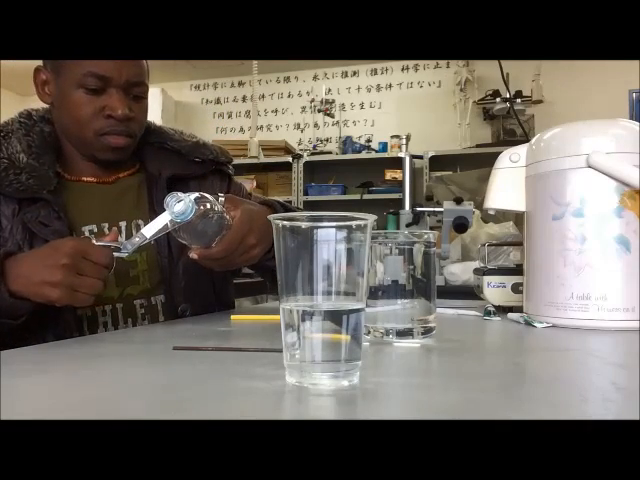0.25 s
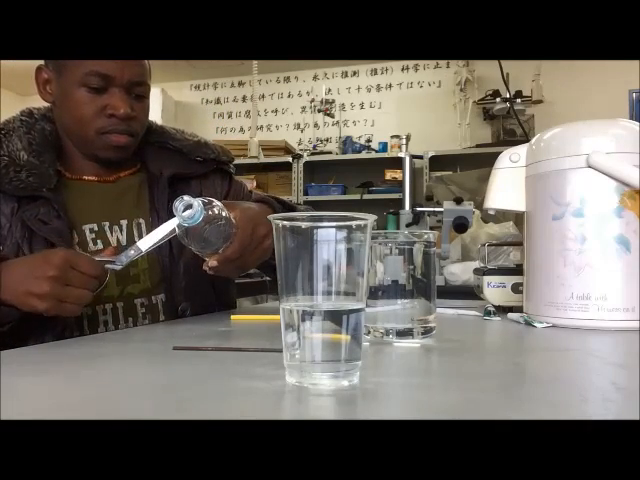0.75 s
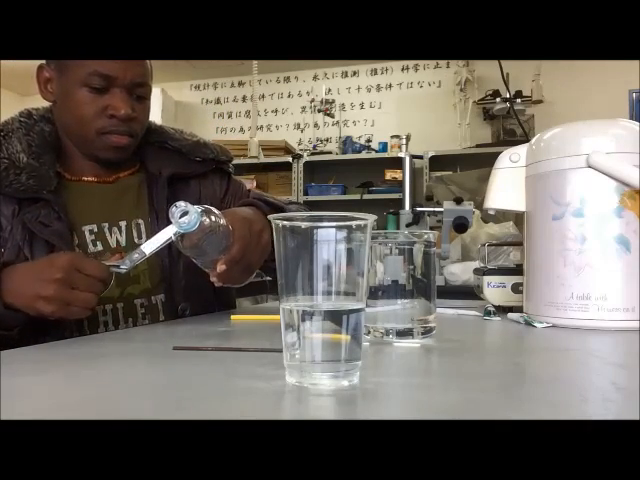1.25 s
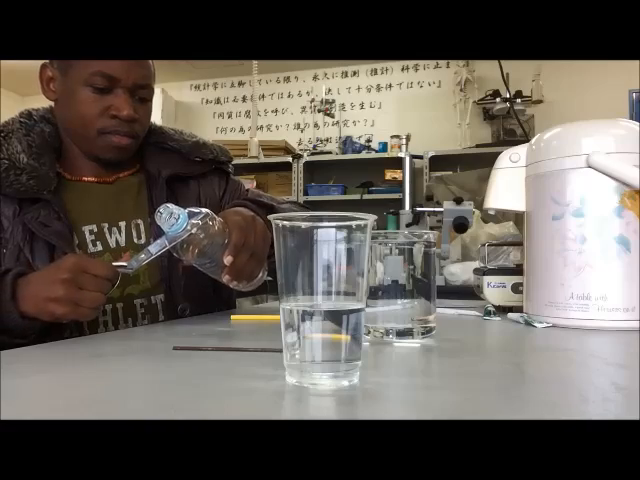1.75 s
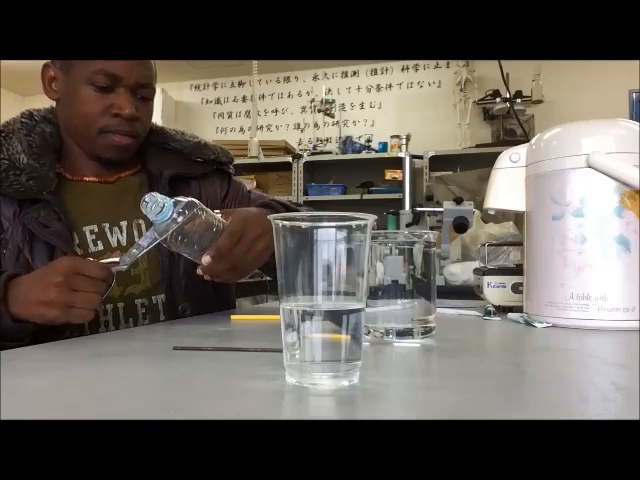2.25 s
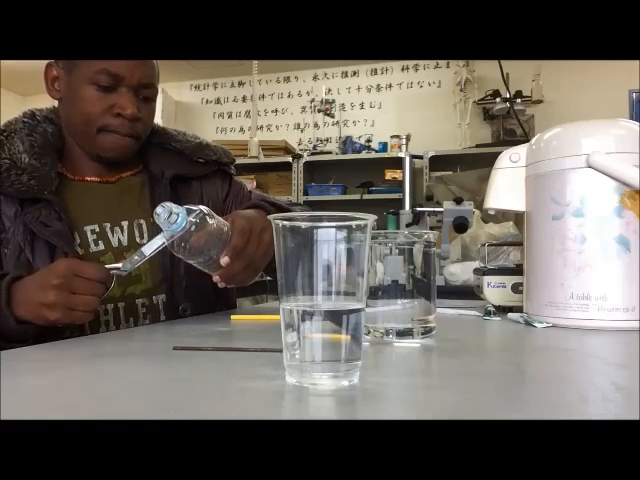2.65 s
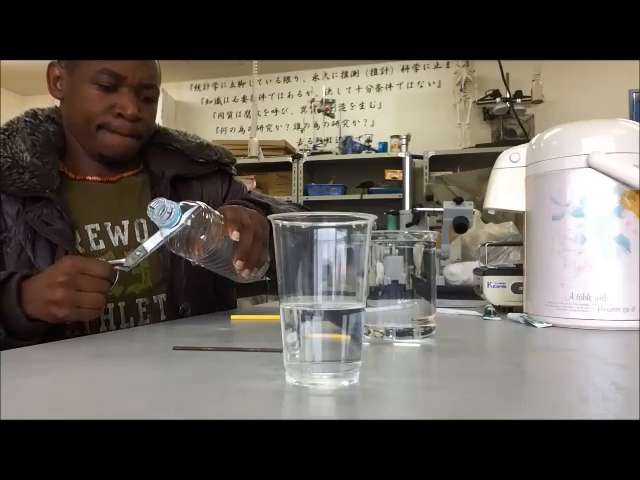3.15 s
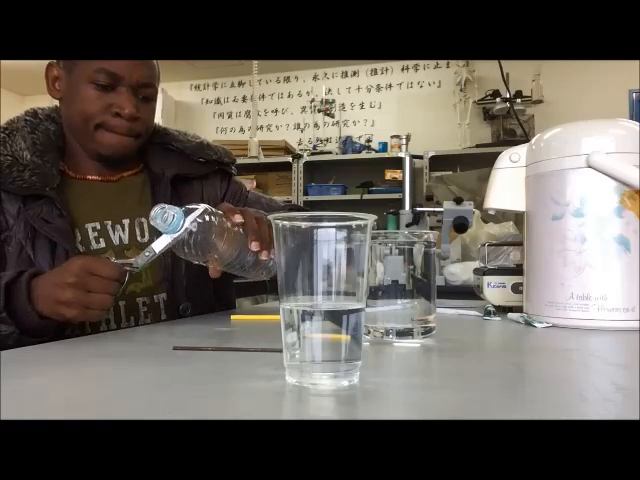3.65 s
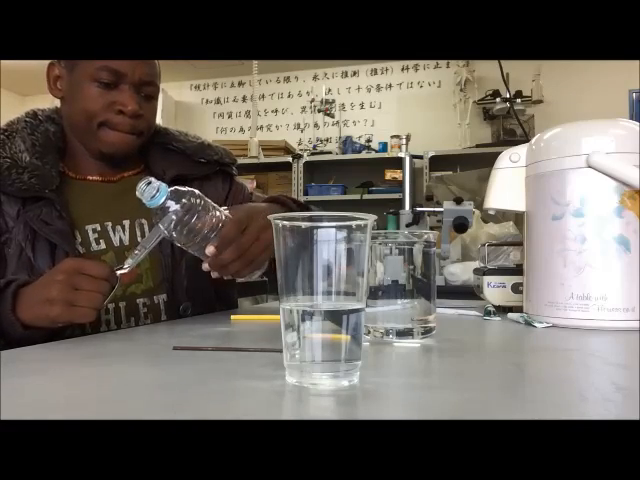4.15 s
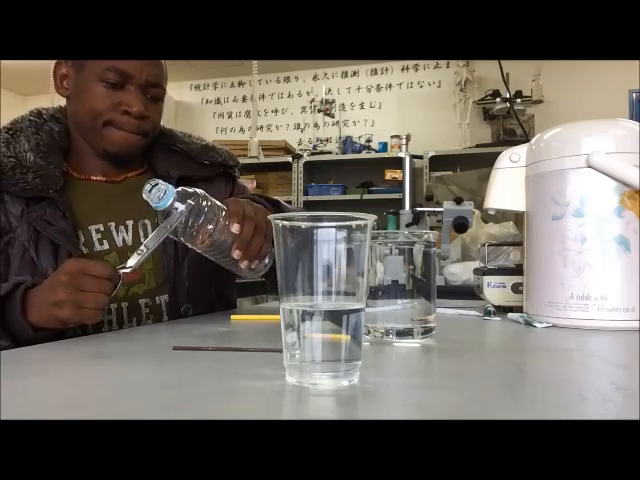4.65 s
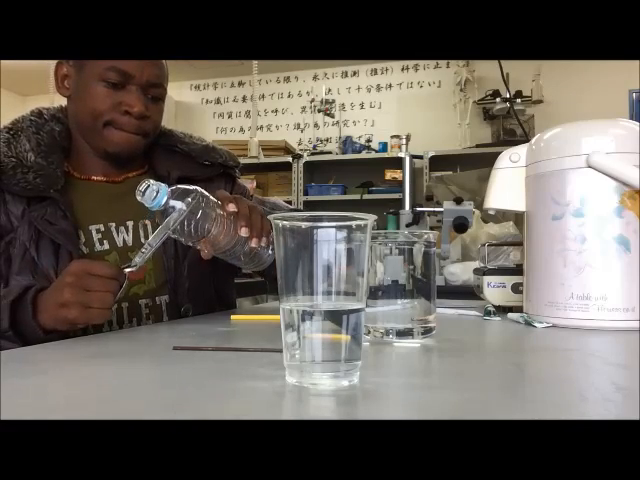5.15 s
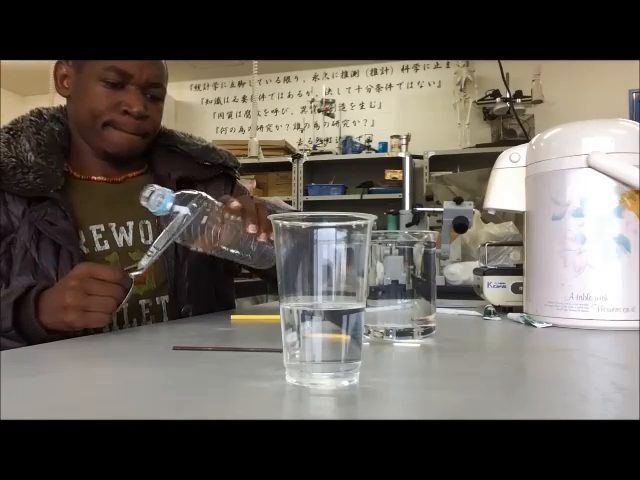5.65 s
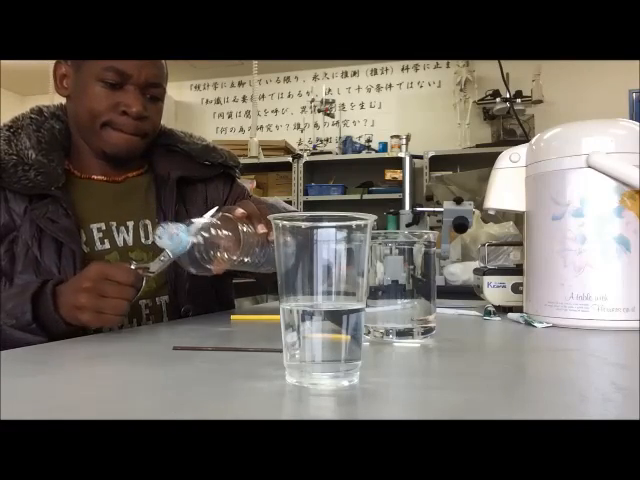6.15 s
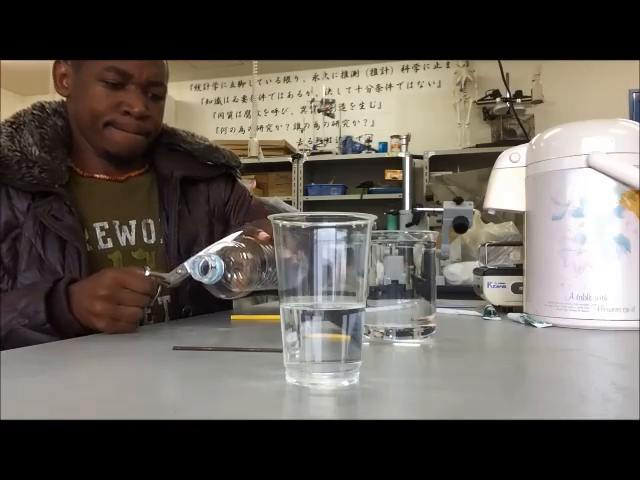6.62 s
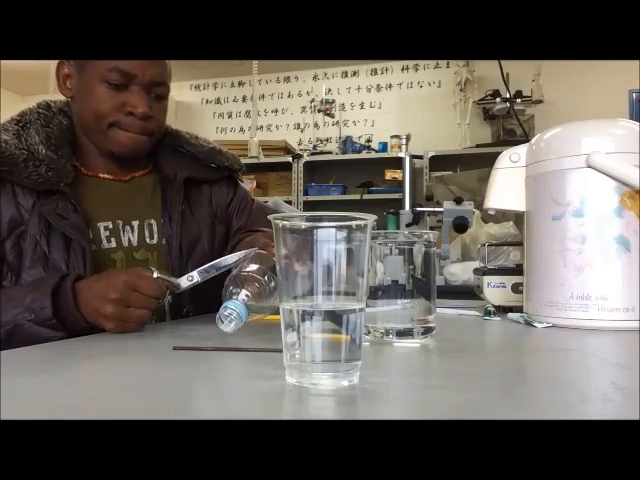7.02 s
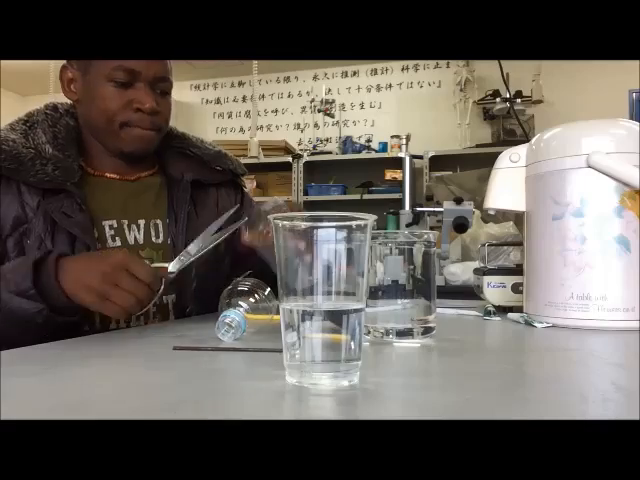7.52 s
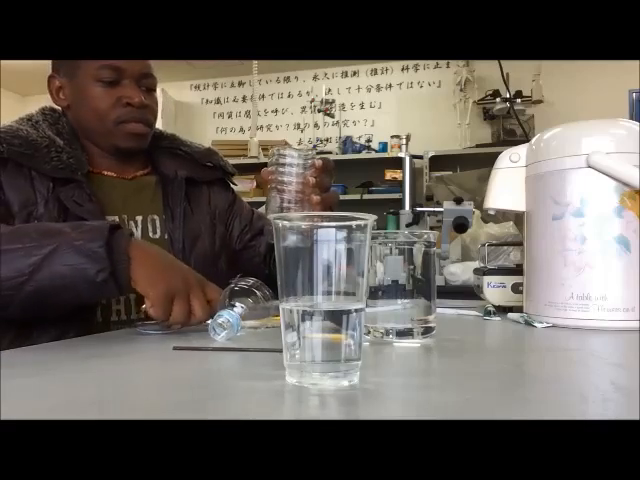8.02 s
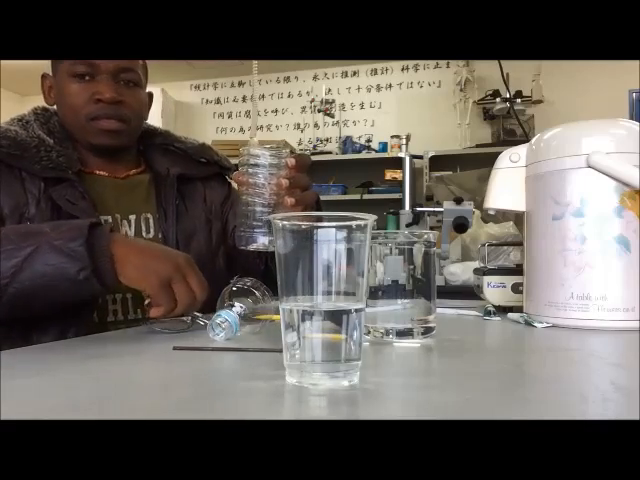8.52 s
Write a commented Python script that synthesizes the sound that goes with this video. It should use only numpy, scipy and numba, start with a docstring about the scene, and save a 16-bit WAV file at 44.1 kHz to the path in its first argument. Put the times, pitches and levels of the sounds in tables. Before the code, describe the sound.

Close mono pickup at a hard bench, faint room rumble and hiss, short reverberation. A bright crack opens the cutting, then scattered plastic crackles, soft blade rasps and low creaking resonances, some snaps ringing hollow. After the final snip the light bottle neck patters down in quickening bounces, steel scissors knock and jingle on the bench, and a faint shuffle ends with a small squeaky scrape.

```python
"""A faint room bed opens, then scissors stab the neck of a thin plastic bottle at a classroom bench.
Coloured clicks and torn noise make the snaps, ringing the hollow bottle mostly higher as the cut opens; between
them, clumped random slips rasp at the blades and creak through moving resonances of the bottle. The blades meet;
the neck, a set of damped modes, falls and bounces on the bench, and the blades rustle faintly. The scissors
ring and knock as they are put down, a hand shuffles on the bench, and they scrape and squeak as they are pushed."""
import sys
import numpy as np
from scipy import signal
from scipy.fft import rfft, irfft, next_fast_len
from scipy.io import wavfile
from scipy.ndimage import map_coordinates
from numba import njit

SR = 44100
rng = np.random.default_rng(int(sys.argv[2]) if len(sys.argv) > 2 else 0)


def dump_mix(stems):
    """Bounce the given channels to the path in sys.argv[1] as a 16-bit WAV at rate SR."""
    frames = np.atleast_2d(stems).T  # one column per channel
    limited = np.clip(frames, -1, 1)  # hard clip at full scale
    pcm = np.round(limited * 32767).astype(np.int16)
    wavfile.write(sys.argv[1], SR, pcm)


N = 387189  # length in samples

# Spectrum of the room's air. Each row: frequency in Hz, relative density in dB per Hz.
AIR = [(25, -21), (75, -4.5), (200, -11), (800, -17), (1500, -23), (3000, -28), (10000, -33), (15500, -38)]
# Decay of the room's tail. Each row: frequency in Hz, t60 in seconds.
ROOM = [(100, 0.29), (400, 0.44), (1200, 0.17), (3000, 0.18), (8000, 0.26), (15000, 0.25)]
# The wall snaps and buckles. Each row: time of the break in seconds, then levels in dB before trims:
# sharp crack, crunch, wall ring, hollow body.
SNAPS = [(0.4174, -55, -62, -77, -62), (0.439, -17, -28.5, -30, -33), (1.118, -64.5, -47, -46.5, -47.5),
         (1.2066, -75, -71, -49.5, -48.5), (1.401, -62.5, -61.5, -89.5, -73),
         (1.4408, -44.5, -45, -34.5, -33), (1.5144, -49, -48, -46, -48.5), (1.5612, -55, -51.5, -53, -45),
         (1.6387, -41, -38.5, -42.5, -38), (1.812, -30, -38, -40.5, -50.5),
         (2.2962, -58.5, -46.5, -37.5, -40), (2.4359, -41.5, -45, -35, -38.5),
         (2.4913, -29.5, -32.5, -41, -55), (2.5267, -66, -68, -35, -52), (2.564, -46.5, -46, -53, -50.5),
         (2.684, -62.5, -70, -59.5, -50.5), (2.935, -55.5, -49, -35.5, -41), (2.998, -45, -44, -37, -43.5),
         (3.2498, -45, -37.5, -23, -25.5), (3.7724, -56.5, -54, -37, -25.5), (4.027, -59, -52.5, -52, -37),
         (4.2681, -67.5, -62, -52.5, -48), (4.6259, -70, -63, -65, -45), (4.9851, -51, -53.5, -56, -43.5),
         (5.1453, -69, -62, -61.5, -51.5), (5.3708, -61, -56, -44.5, -53), (5.3863, -47.5, -50, -37.5, -55),
         (5.6843, -54, -54, -71, -37), (5.793, -57, -59, -43.5, -29), (5.864, -39, -39.5, -52, -29.5),
         (5.9194, -45.5, -51.5, -62, -49), (6.0758, -64, -61.5, -58, -35),
         (6.132, -37.5, -43.5, -39.5, -33.5), (6.1398, -43, -41.5, -40, -30), (6.236, -54, -50, -46, -39.5),
         (6.329, -71, -60.5, -55, -35.5), (6.4327, -61, -51, -53, -34), (6.5227, -77, -54, -54.5, -45.5),
         (6.629, -79, -60.5, -60, -49), (7.0049, -58.5, -56.5, -76, -39), (7.0136, -55, -54, -58, -44),
         (7.0406, -62.5, -70, -88, -43.5), (7.245, -46.5, -42, -58, -31)]
# Resonances as the cut opens. Each row: time in seconds, air cavity in Hz, panel in Hz, wall ring in Hz.
BOTTLE = [(.44, 304.6, 552, 1125), (1.44, 370.8, 573, 1168), (3.25, 423, 560, 1196),
          (3.8, 477.4, 560, 1223), (5, 500, 586, 1257), (6.1, 493.8, 655.4, 1315), (7.2, 530, 610, 1380)]
# Spectra of the sharp crack, the crunch, the blades clashing shut and the blades' rasp.
# Each row: frequency in Hz, relative density in dB per Hz.
CRACK = [(3000, -30.5), (5200, -6.5), (6300, 0), (7500, 1), (8500, 0.5), (10000, -4.5), (14000, -15),
         (16000, -21.5)]
CRUNCH = [(600, -17), (1400, -4.5), (2500, -2.5), (3400, -2.5), (4000, 0.5), (4800, -11), (7000, -18),
          (15000, -37)]
CLASH = [(3000, -12), (7000, -10), (10000, -6), (14500, -4), (16000, -11)]
RASP = [(600, -29), (1300, -7.5), (1950, 8), (2400, -9), (3400, 5.5), (4000, 1.5), (4800, -8), (7300, 0.5),
        (10000, -1.5), (15500, -14)]
# Strokes of the blades, biting or only bending the wall; last, the blades rustle faintly.
# Each row: start in seconds, hold in seconds, rasp level in dB before trims, creak level in dB.
BLADE_MOVES = [(.56, 0.076, -64.5, -65), (.67, 0.037, -56, -52.5), (.945, 0.055, -52.5, -55.5),
               (1.16, .11, -64, -56.5), (1.495, 0.05, -53.5, -46), (1.78, .03, -62, -58),
               (2.03, 0.1, -76, -62.5), (2.16, 0.19, -65, -51), (2.45, 0.066, -48, -49.5),
               (2.61, 0.11, -62.5, -65), (2.975, 0.026, -45.5, -45.5), (3.12, 0.21, -64, -56.5),
               (3.50, 0.044, -55.5, -54.5), (3.55, 0.032, -46, -51), (3.715, .04, -58.5, -44),
               (3.90, .24, -76.5, -55), (4.335, 0.027, -46.5, -43.5), (4.40, 0.082, -59.5, -49),
               (4.52, .2, -66, -57.5), (4.91, 0.046, -46, -39.5), (5.10, 0.11, -72.5, -63),
               (5.29, 0.053, -60.5, -52), (5.39, 0.033, -55, -47.5), (5.625, .04, -73.5, -57),
               (5.68, 0.014, -54.5, -38.5), (5.76, 0.043, -70, -46.5), (5.825, 0.026, -52, -50),
               (5.95, .02, -67.5, -53.5), (6.04, 0.48, -76, -65.5), (6.935, 0.023, -66, -57.5),
               (7.58, 0.051, -71.5, -79)]
# Modes of the neck, then of the blades. Each row: frequency in Hz, relative level in dB, t60 in seconds.
NECK = [(331, -6.5, 0.058), (530, -2, 0.029), (692, 3, 0.022), (1160, 1, 0.033), (1430, 6.5, 0.022),
        (1635, -6, 0.022), (1870, -12, 0.018), (3870, -19, 0.11), (4200, -23, 0.046)]
STEEL = [(4230, -14, 0.12), (5370, -13, 0.11), (5750, -10, .08), (7360, -4, 0.089), (8300, -9.5, 0.16),
         (9426, -6.5, 0.11), (10350, -14, .14), (10980, -11, .12), (12020, -5, 0.11), (12520, -10, .12),
         (13200, -16, .09), (14500, -9, .1)]
# The scissors touch the bench. Each row: time in seconds, steel level in dB before trim, knock level in dB.
CONTACTS = [(7.879, -37.5, -37.5), (7.8909, -27, -26.5), (7.907, -31, -32.5), (7.919, -45, -52),
            (8.403, -73, -53.5), (8.4732, -79, -48)]
# A hand shuffles on the bench, then the scissors are pushed along it. Each row: start in seconds,
# hold in seconds, scrape level in dB, squeak level in dB, blade ring level in dB.
BENCH_MOVES = [(8.19, 0.077, -68, -89, -103), (8.42, 0.14, -52.5, -60, -84),
               (8.515, 0.079, -53.5, -51.5, -65), (8.68, 0.049, -64, -83.5, -90)]
# Spectra of the bench's knock, the low thud and the scrape.
# Each row: frequency in Hz, relative density in dB per Hz.
KNOCK = [(60, -19), (300, -0.5), (800, -1.5), (1200, 3.5), (1600, 5), (2200, -6.5), (4000, -14),
         (7000, -22), (15000, -28.5)]
THUD = [(25, -18.5), (65, -3), (260, -2), (500, -16.5), (1200, -24.5)]
SCRAPE = [(70, -5), (300, 1), (1800, -9.5), (2600, -22), (4800, -25.5), (5700, -24), (6800, -30.5),
          (15000, -36)]

HIT = SR // 3  # samples in which a hit dies away
LEAD = 90  # samples of tearing before the wall gives way
# a move of the hand swells, holds and lets go
SWELL_DB_PER_S, RELEASE_DB_PER_S = 655, 418.5
# after a snap the wall creaks on as it settles, starting below the snap's hollow body
SETTLE_DB, SETTLE_DB_PER_S = -12, 269.5
GRIP_DB = -73.5  # the hand's steady grip keeps the bottle creaking faintly
CLUMP_DB = 3  # depth of the clumping of the tears
# the neck lands: time, level, first flight, each flight over the last, loss a bounce
LANDING_S, LANDING_DB, FLIGHT_S, FLIGHT_SHRINK, BOUNCE_LOSS_DB = 7.2759, -25.5, .0402, .845, 4
TOP_HZ = 15450  # upper band limit


def amp(db):
    """Decibels to gain."""
    return 10 ** (np.asarray(db) / 20)


def unit(x):
    """Scale to rms 1."""
    return x / np.sqrt(np.mean(x ** 2) + 1e-20)


def blow(x):
    """Scale a hit to the energy of 10 ms at rms 1."""
    return x * np.sqrt(SR / 100 / np.sum(x ** 2))


def along(points, hz):
    """Read (Hz, value) points on a log frequency axis."""
    f, v = np.transpose(points)
    return np.interp(np.log(hz + 1), np.log(f + 1), v)


def curves(rows, at):
    """Each column after the time, read at the given times."""
    s, *cols = np.transpose(rows)
    return [np.interp(at, s, c) for c in cols]


def clock(size):
    """Sample times in seconds."""
    return np.arange(size) / SR


def wobble(rate):
    """A smooth random curve, rate knots a second."""
    knots = rng.standard_normal(int(N * rate / SR) + 4)
    return map_coordinates(knots, [np.arange(N) * rate / SR])


def add(track, s, x):
    """Mix x into the track at time s."""
    part = track[round(s * SR):][:len(x)]
    part += x[:len(part)]


def colour(x, spectrum):
    """Causal minimum-phase filter with the given spectrum."""
    size = 4096
    cep = irfft(np.log(amp(along(spectrum, np.fft.rfftfreq(size, 1 / SR)))))
    # fold the cepstrum forward in time so that nothing sounds early
    cep[1:size // 2] *= 2
    cep[size // 2 + 1:] = 0
    return signal.fftconvolve(x, irfft(np.exp(rfft(cep))))[:len(x)]


def burst(t, t60, spectrum):
    """A coloured puff of noise that dies away."""
    puff = rng.standard_normal(len(t)) * amp(-60 * t / t60)
    return blow(colour(puff, spectrum))


def ring(t, modes, attack, scatter_db=2):
    """Damped modes, struck at new strengths and phases."""
    waves = np.zeros(len(t))
    for hz, db, t60 in modes:
        level = amp(db + scatter_db * rng.normal() - 60 * t / t60)
        waves += level * np.sin(2 * np.pi * (hz * t + rng.random()))
    return blow(waves * (1 - np.exp(-t / attack)) ** 2)


def grains(rate, spread_db):
    """Random tiny slips, rate a second on average, their sizes spread at random in dB."""
    sizes = amp(spread_db * np.minimum(rng.exponential(size=N), 4))
    return unit((rng.random(N) < rate / SR) * sizes * rng.choice([-1, 1], N))


@njit
def resonate(x, hz, width_hz):
    """A resonance whose centre moves."""
    y, z = np.zeros(len(x)), 0j
    for i in range(len(x)):
        z = z * np.exp((2j * np.pi * hz[i] - np.pi * width_hz) / SR) + x[i]
        y[i] = z.real
    return y


def room(x, wet_db):
    """The classroom's tail: noise that builds up over a few milliseconds and decays by frequency."""
    hz, t, z = signal.stft(rng.standard_normal(HIT), SR, nperseg=256)
    decay = amp(-60 * t / along(ROOM, hz)[:, None])
    tail = signal.istft(z * decay, SR, nperseg=256)[1]
    tail *= 1 - np.exp(-(clock(len(tail)) / 0.0025) ** 2)
    return amp(wet_db) * signal.fftconvolve(x, tail / np.linalg.norm(tail))[:len(x)]


def in_room(x, wet_db):
    """Direct sound plus the room."""
    return x + room(x, wet_db)


def gesture(t, start, length):
    """Level in dB of one move of the hand: it swells, holds at 0 and lets go."""
    swell = -SWELL_DB_PER_S * np.maximum(start - t, 0)
    release = -RELEASE_DB_PER_S * np.maximum(t - start - length, 0)
    return swell + release


def gesture_levels(rows):
    """One dB curve for each level column of (start, length, dB, ..) rows; the strongest move prevails."""
    t = clock(N)
    levels = np.full((len(rows[0]) - 2, N), -120.)
    for start, length, *dbs in rows:
        near = slice(*np.searchsorted(t, [start - .5, start + length + .5]))
        move = np.array(dbs)[:, None] + gesture(t[near], start, length)
        levels[:, near] = np.maximum(levels[:, near], move)
    return levels


def room_air():
    """Coloured noise, drifting slightly in level, gives the faint rumble and hiss of the room."""
    noise = unit(colour(rng.standard_normal(N), AIR))
    return amp(-71.5 + 0.67 * wobble(2.8)) * noise


def fracture(t, spectrum, sharp, t60, wet_db):
    """One clean click (its share of the energy is sharp) amid a short tearing; the room answers the click."""
    click = blow(colour(1. * (t == t[LEAD]), spectrum))
    swell = np.minimum(t / t[LEAD], 1) ** 3
    tearing = blow(swell * burst(t, t60, spectrum))
    sharp = np.clip(sharp, 0, 1)
    return np.sqrt(sharp) * click + np.sqrt(1 - sharp) * tearing + room(click, wet_db)


def through_wall(x, share, t60):
    """The thin wall's many short modes take a share of the energy and ripple the spectrum."""
    t = clock(1024)
    modes = rng.standard_normal(len(t)) * amp(-60 * t / t60) * (t > 0)
    rung = signal.fftconvolve(x, modes / np.linalg.norm(modes))[:len(x)]
    share = np.clip(share, 0, 1)
    return np.sqrt(1 - share) * x + np.sqrt(share) * rung


def snaps():
    """Each snap is a brief crack; the wall springs back and rings the hollow bottle."""
    out, t = np.zeros(N), clock(HIT)
    for s, crack_db, crunch_db, wall_db, body_db in SNAPS:
        air_hz, panel_hz, wall_hz = curves(BOTTLE, s)
        # the harder the break, the cleaner it runs
        sharp = np.interp(crack_db, [-42, -18], [.1, .8])
        crack = fracture(t, CRACK, sharp, t60=.014, wet_db=-7.0)
        crack = through_wall(crack, share=0.034, t60=0.0078)
        crunch = fracture(t, CRUNCH, sharp / 2, t60=0.023, wet_db=-4.5)
        crunch = through_wall(crunch, share=0.36, t60=.015)
        add(out, s - t[LEAD], amp(crack_db + 1) * crack + amp(crunch_db + 2) * crunch)

        # the grip bends the panels differently every time
        bend = np.exp(.04 * rng.standard_normal(2))
        panel_hz, side_hz = np.array([panel_hz, 1.09 * wall_hz]) * bend
        wall_hz = wall_hz * (1 + 0.011 * rng.normal())
        air_hz = air_hz * (1 + 0.038 * rng.normal())
        # t60 in seconds: the bottle rings longest while it is still closed
        life = np.interp(s, [BOTTLE[0][0], BOTTLE[1][0], BOTTLE[-1][0]], [.16, .07, .048])
        wall = ring(t, [(wall_hz, 0, 0.94 * life), (side_hz, -3, .022)], attack=0.00054)
        body = ring(t, [(air_hz, 0, life), (panel_hz, .5, 0.66 * life)], attack=0.0016)
        hollow = amp(wall_db) * wall + amp(body_db) * body
        add(out, s - t[LEAD] / 2, in_room(hollow, wet_db=-10.0))
    # the first stab thumps the hand; the last cut ends with the blades meeting
    add(out, SNAPS[1][0] - .008, amp(-39.5) * burst(t, .07, THUD))
    add(out, SNAPS[-1][0], amp(-37.0) * fracture(t, CLASH, 0.092, t60=0.016, wet_db=-1.5))
    return out


def settling():
    """Strength of the creak that each snap leaves behind, summed as power."""
    power, t = np.zeros(N), clock(SR // 2)
    for s, *_, body_db in SNAPS:
        add(power, s, amp(body_db + SETTLE_DB - SETTLE_DB_PER_S * t) ** 2)
    return np.sqrt(power)


def crackle(level_db, rate, spread_db):
    """Tiny pings of a few cycles each, scattered in time, pitch and strength."""
    t = clock(128)
    when, life, size = rng.random((3, int(rate * N / SR), 1))
    start = (when * (N - len(t))).astype(int)
    hz = np.minimum(3600 * np.exp(.55 * rng.standard_normal(when.shape)), 13000)
    strength = amp(spread_db * np.minimum(-np.log(1 - size), 3))
    decay = np.exp(-hz * t / (1 + 3 * life))
    pings = strength * np.sin(2 * np.pi * hz * t) * decay
    places = start + np.arange(len(t))
    return amp(level_db) * unit(np.bincount(places.ravel(), pings.ravel(), N))


def blades_and_creaks():
    """Clumped slips rasp, crackle and rustle at the blades; slower ones creak through the bottle's resonances."""
    t = clock(N)
    held = (t > SNAPS[0][0]) & (t < SNAPS[-1][0])
    blade_db, move_creak_db = gesture_levels(BLADE_MOVES)
    flex = np.sqrt(amp(move_creak_db) ** 2 + settling() ** 2 + held * amp(GRIP_DB) ** 2)
    air_hz, panel_hz, wall_hz = curves(BOTTLE, t)

    rasp = unit(colour(grains(rate=1500, spread_db=-2.0), RASP))
    rasp = amp(blade_db - 2.5 + 3.7 * wobble(70)) * rasp
    tears = crackle(blade_db - 5 + CLUMP_DB * wobble(rate=60), rate=800, spread_db=4)
    edge = through_wall(rasp, share=0.51, t60=0.019) + tears

    slip_spectrum = [(100, -29.5), (330, 4.5), (650, 1), (900, -19), (2500, -16.5)]  # (Hz, dB per Hz)
    slips = colour(grains(rate=300, spread_db=4.5), slip_spectrum)
    # the shifting grip detunes air and panel in opposite directions
    grip = np.exp(.065 * wobble(14))
    air = unit(resonate(slips, air_hz * grip, 68.0))
    panel = unit(resonate(slips, panel_hz / grip, 62.))
    body = air + amp(-2) * panel
    wall_slips = grains(rate=480, spread_db=4.5)
    wall = unit(resonate(wall_slips, wall_hz * (1 + 0.005 * wobble(27)), 70.))
    creak = flex * unit(body) + (amp(-17) * flex + amp(blade_db - 6.0)) * wall
    return in_room(edge, wet_db=-9.5) + in_room(creak, wet_db=-8.5)


def falling_neck(count=8):
    """The stiff neck bounces ever faster and softer, its modes struck afresh at each landing."""
    out, t, s = np.zeros(N), clock(SR // 2), LANDING_S
    for k in range(count):
        hit = ring(t, NECK, attack=.0003) + amp(-4.5) * burst(t, .028, KNOCK)
        add(out, s, in_room(amp(LANDING_DB - BOUNCE_LOSS_DB * k) * hit, wet_db=-7.5))
        s += FLIGHT_S * FLIGHT_SHRINK ** k
    return out


def scissors_down():
    """The steel chatters, rings and knocks the bench: damped modes and puffs of coloured noise."""
    out, t = np.zeros(N), clock(SR // 2)
    for s, steel_db, knock_db in CONTACTS:
        steel = ring(t, STEEL, attack=0.0012) + amp(-3.0) * burst(t, 0.14, RASP)
        knock = burst(t, 0.11, KNOCK) + amp(-9.0) * burst(t, 0.4, THUD)
        add(out, s, in_room(amp(steel_db - 3.5) * steel + amp(knock_db) * knock, wet_db=-11.5))
    return out


def sliding_on_bench():
    """Short slips scrape as the hand shuffles, then scrape, squeak and ring as the scissors are pushed."""
    scrape_db, squeak_db, blade_db = gesture_levels(BENCH_MOVES)
    slips = grains(rate=900, spread_db=-2.5)
    squeak_hz = 1720 + 65 * wobble(60)
    # the same resonance twice over, for a narrower squeak
    squeak = resonate(resonate(slips, squeak_hz, 240.), squeak_hz, 240.)
    squeak = amp(squeak_db) * unit(squeak)
    scrape = unit(colour(grains(rate=3400, spread_db=0.0), SCRAPE))
    scrape = amp(scrape_db + 4.5 * wobble(55)) * scrape
    blade_slips = grains(rate=150, spread_db=2.5)
    blades = signal.fftconvolve(blade_slips, ring(clock(SR // 2), STEEL, attack=.0005))[:N]
    blades = amp(blade_db) * unit(blades)
    return in_room(scrape + squeak + blades, wet_db=-6)


def scene():
    """All sources mixed to one channel."""
    bottle = snaps() + blades_and_creaks() + falling_neck()
    return (room_air() + bottle + scissors_down() + sliding_on_bench())[None]


def record(dry):
    """Soft saturation rounds off the loudest peaks; a steep low-pass removes what lies above the band limit."""
    dry = dry / (1 + (dry / .85) ** 6) ** (1 / 6)
    size = next_fast_len(N + SR // 2)
    hz = np.fft.rfftfreq(size, 1 / SR)
    low_pass = 1 / np.sqrt(1 + (hz / TOP_HZ) ** 160)
    return irfft(rfft(dry, size) * low_pass, size)[:, :N]


dry = scene()
out = record(dry)
dump_mix(out)
```